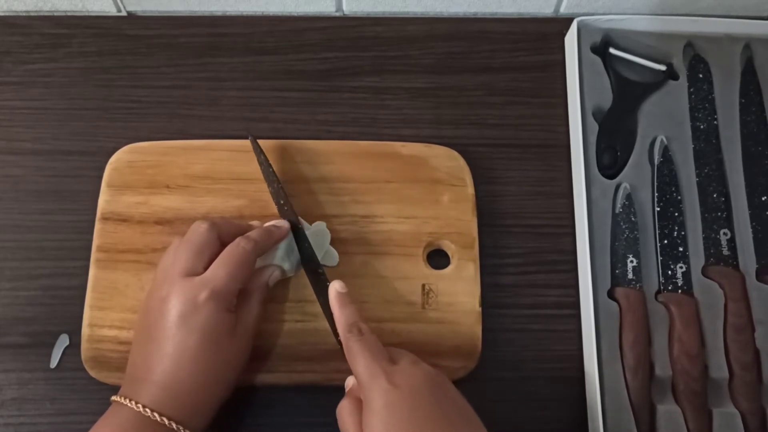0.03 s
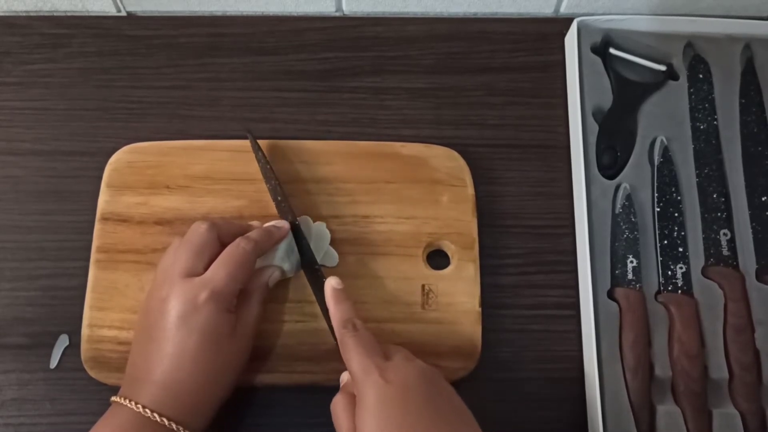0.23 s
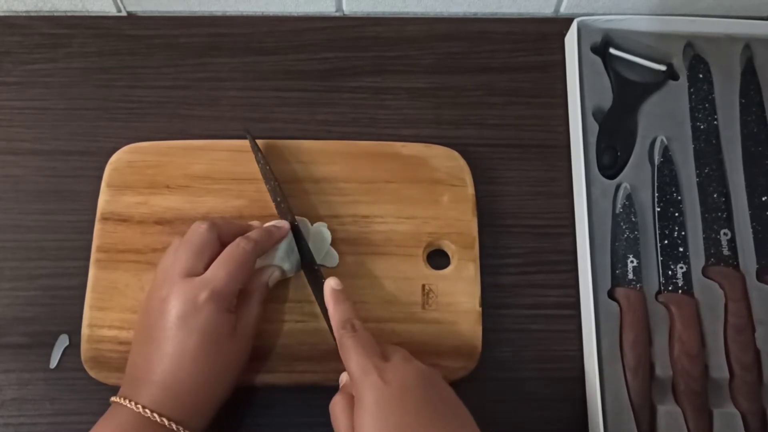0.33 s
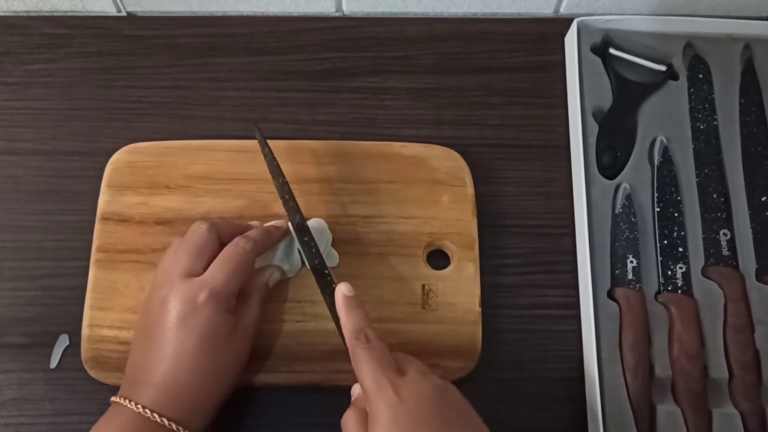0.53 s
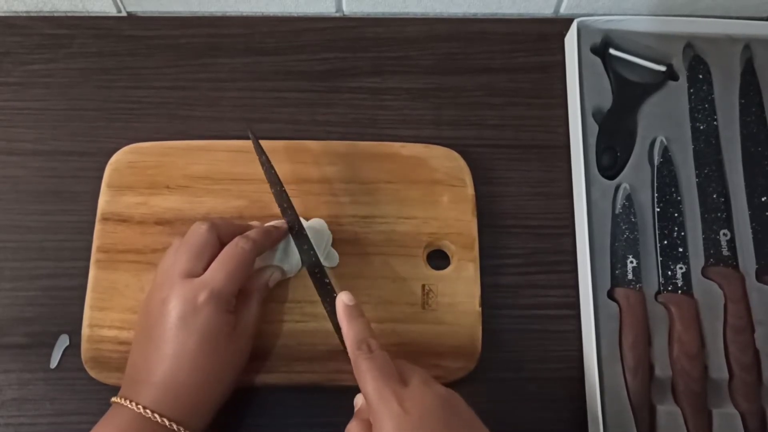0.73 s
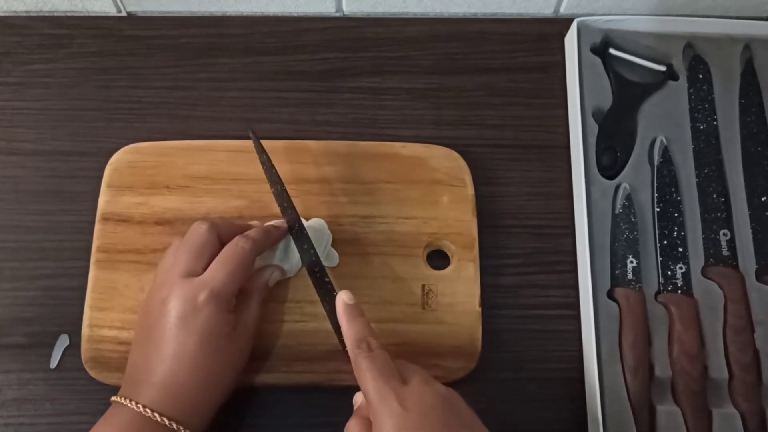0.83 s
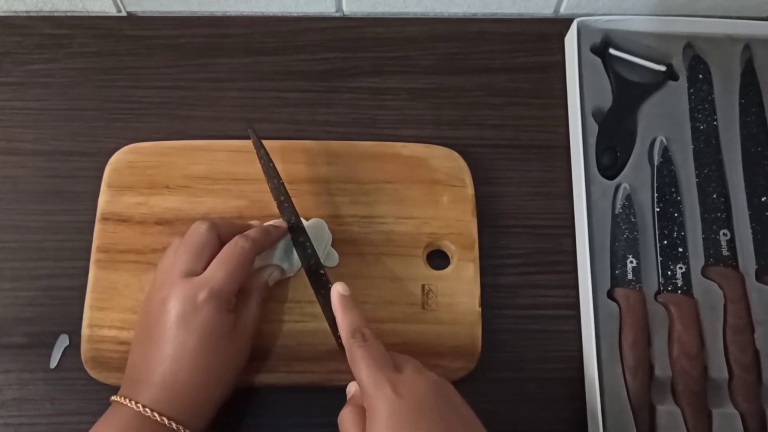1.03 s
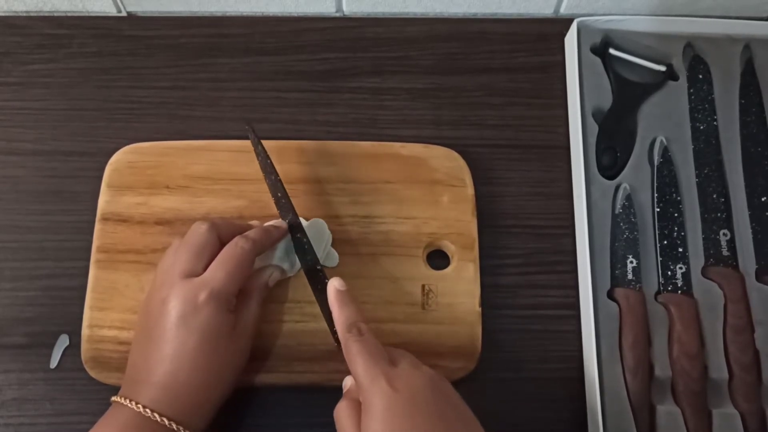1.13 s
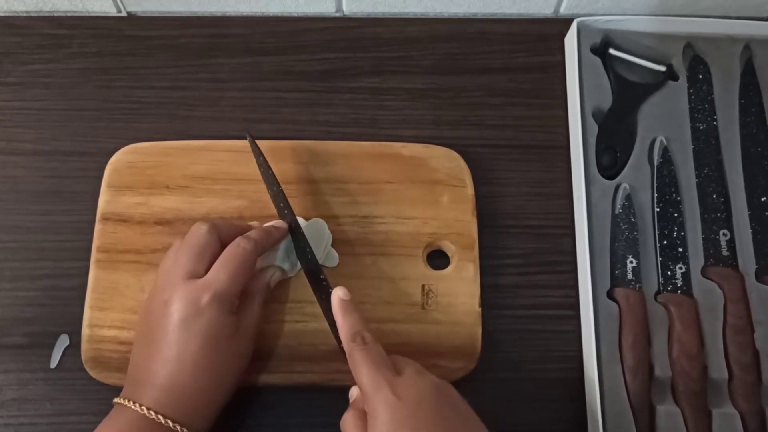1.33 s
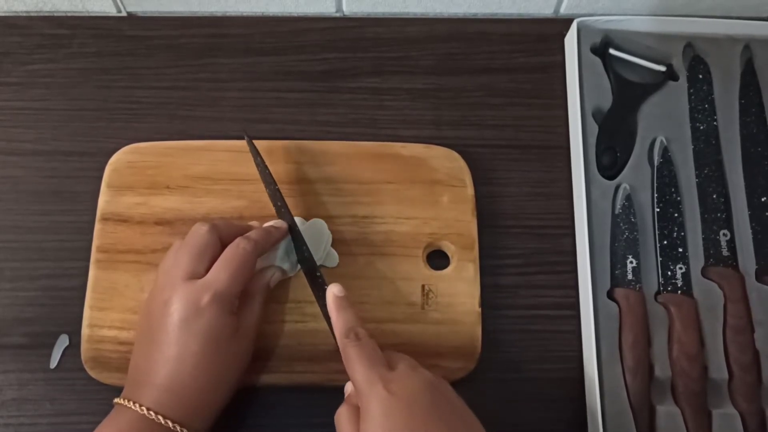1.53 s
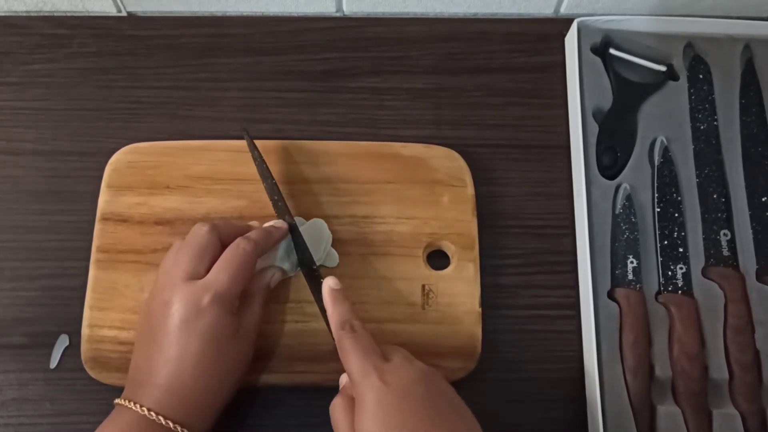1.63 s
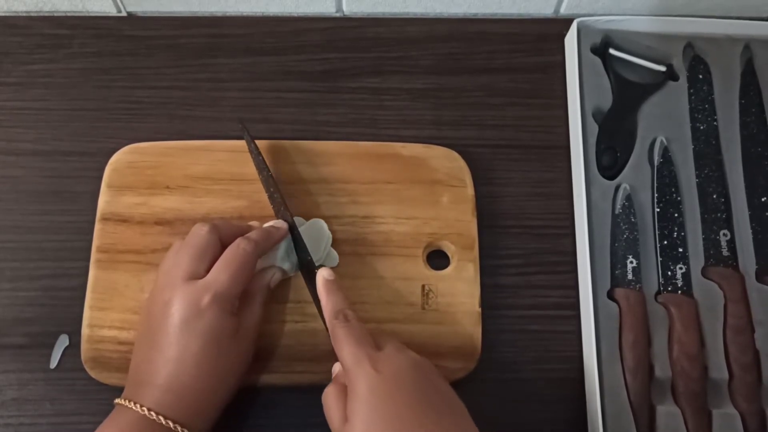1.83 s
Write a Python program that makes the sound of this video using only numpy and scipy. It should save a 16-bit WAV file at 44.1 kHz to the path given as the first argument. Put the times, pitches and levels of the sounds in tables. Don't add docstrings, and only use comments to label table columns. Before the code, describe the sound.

After a brief quiet moment, one hard woody chop lands on a board on a table, with a soft low thud beneath and quick indoor reflections; then near silence with very faint room rumble and airy hiss.

```python
import sys
import numpy as np
from scipy import signal
from scipy.fft import rfft, irfft
from scipy.io import wavfile

SR = 44100
rng = np.random.default_rng(int(sys.argv[2]) if len(sys.argv) > 2 else 0)


def inscribe(sig):
    pcm = np.round(np.clip(np.atleast_2d(sig).T, -1, 1) * 32767)
    wavfile.write(sys.argv[1], SR, pcm.astype(np.int16))


def to_linear_factor(level_db):
    exponent = np.asarray(level_db, float) / 20
    return 10 ** exponent


N = 83790

KNOCK_S, CONTACT_S, EDGE_CONTACT_S = .22996, .00024, .00008
RIGHT_LEADS_S, BOARD_DB = .00005, .2
# pitch_hz, level_db, t60_s, polarity, left_over_right_db
BOARD_MODES = [(320, -30, .02, 1, -10), (760, -17, .021, 1, 2.5), (987, -9.5, .015, 1, -4),
               (1089, -19, .053, 1, 6), (1279, -0.7, .011, -1, 0), (1621, -12.3, .045, -1, 0),
               (1929, -8.4, .0066, 1, 1.2), (2404, -26, .02, 1, -4)]
# pitch_hz, level_db, t60_s, polarity, left_over_right_db
BLADE_MODES = [(2950, -40, .008, -1, 4), (3300, -33, .010, 1, 8), (3600, -27, .010, -1, -6),
               (4130, -23, .012, 1, -1), (4470, -31, .012, -1, 0), (5000, -40, .010, 1, -3),
               (5550, -43, .010, -1, 3), (6000, -36, .012, 1, 2), (6580, -30, .014, -1, -2),
               (7080, -33, .018, 1, -1), (7560, -30, .022, -1, 0), (7850, -30, .028, 1, -5),
               (8250, -31, .018, -1, 6), (10250, -39, .012, 1, 0)]
SLICE_S, SLICE_DB, SLICE_BRIGHT_DB = .004, -39, -10
# pitch_hz, level_db, t60_s, polarity, left_over_right_db
AIR_GAP_MODES = [(201, -32.5, .08, 1, -0.5), (490, -28.5, 0.12, 1, 1), (645, -35, 0.11, -1, -0.5)]
# pitch_hz, level_db, t60_s, polarity, left_over_right_db
TABLE_MODES = [(165, -41, .33, 1, 0), (393, -41, .22, -1, 4), (732, -43, .3, -1, 0), (768, -47, .5, -1, -3),
               (870, -43, .5, 1, 3), (947, -40, .4, -1, 0), (1136, -40, .4, 1, 0), (1228, -36, .3, -1, 0),
               (1362, -42, .3, 1, 0), (1588, -42, .24, -1, 0)]
# pitch_hz, level_db, t60_s, polarity, left_over_right_db
TABLE_TOP_MODES = [(326, -26, .26, 1, -2)]
AIR_GAP_SWELL_S, TABLE_SWELL_S, TABLE_TOP_SWELL_S = .0074, .02, .075
SETTLE_S, SETTLE_HZ, SETTLE_DB, SETTLE_RISE_S = .273, 1266, -30.5, .0038

# pitch_hz, t60_s
ROOM_DECAY = [(100, .5), (300, .34), (600, .30), (1300, .32), (2200, .36), (5000, 0.28), (8500, .26)]
# pitch_hz, level_db (per Hz)
ROOM_COLOUR = [(80, -16), (300, -11.5), (600, -6.5), (1200, 6), (1800, -10.5), (2700, -30), (3950, -18),
               (5100, -32.5)]
# pitch_hz, level_db (per Hz)
ROOM_TOP = [(5100, -40), (6000, -31.5), (7100, -26), (7800, -27.5), (8550, -27.5)]
# pitch_hz, likeness (0-1)
ROOM_LIKENESS = [(150, 0.8), (400, 0.4), (1000, 0.06), (4000, 0.3), (8000, 0)]
ROOM_DB, ROOM_LUMPS_DB = -25.5, 2.8
ROOM_BUILD_S, ROOM_BUILD_HIGH_S = .007, .011

DIP_HZ, DIP_WIDTH_HZ, DIP_SHARE, MIC_TOP_HZ = 5150, 400, .6, 12200
ROUNDING_LEVEL = 1.15

# pitch_hz, level_db (per Hz)
RUMBLE_COLOUR = [(20, -34), (40, -20), (90, -3.5), (165, -3), (300, -13), (700, -18.5), (2100, -28.5),
                 (4300, -29.5)]
RUMBLE_DB, RUMBLE_PATCHY_DB = -61, 1.62
# pitch_hz, likeness (0-1)
LIKENESS = [(30, .25), (80, .55), (200, .53), (400, .16), (1300, .02), (5500, .03), (7000, .7), (9000, .97)]
# pitch_hz, level_db (per Hz)
AIR_COLOUR = [(4300, -5), (4780, -2), (4900, -16), (5500, -15), (6400, -7.5), (7300, -6), (7750, -10.5),
              (8520, -11)]
AIR_DB = -74.5
WHISTLE_HZ, WHISTLE_WIDTH_HZ, WHISTLE_DB = 4640, 219.5, -78.5
# time_s, level_db
WHISTLE_SWELL = [(0, 6.5), (.3, 0), (.6, 3.5), (.8, 5), (1, 3), (1.2, 0), (1.4, -5), (1.9, -1)]
# pitch_hz, width_hz, level_db
THIN_LINES = [(4712, 25, -89.5), (6810, 60, -91.5), (7268, 20, -95)]
# peak_s, length_s, level_db, pulse_depth (exponent)
TRILLS = [
    (0.29, 0.038, -82, 0.398),
    (1.1, 0.07, -86, 4.6),
    (1.8, 0.035, -84, 5.1),
]
TRILL_HZ, TRILL_RATE_HZ, TRILL_WOBBLE_HZ, TRILL_IDLE_DB = 9940, 295, 25, -102
# pitch_hz, level_db (per Hz)
WEAK_BAND_COLOUR = [(8700, -5.5), (9000, -5.5), (9100, 0), (10300, -1), (11250, -2)]
WEAK_BAND_DB, WEAK_BAND_PATCHY_DB = -91.5, 3.5
DUCK_DB, DUCK_S = -33.5, .06
# pitch_hz, level_db (per Hz)
HISS_COLOUR = [(11600, -3.5), (12900, -3), (13100, 1.5), (15500, -1)]
HISS_DB = -76
HISS_JUMP_DB, HISS_JUMP_S, HISS_TAIL_DB, HISS_TAIL_S = 12, .006, 4, .07


def rms_one(x):
    return x / np.sqrt(np.mean(x ** 2) + 1e-30)


def at_hz(points, hz):
    f, v = np.transpose(points)
    return np.interp(np.log(np.maximum(hz, 1)), np.log(f), v)


def drift(rate_hz):
    knots = rng.standard_normal(80)
    return np.interp(np.arange(N) / SR * rate_hz, np.arange(80), knots)


def bandpass(x, low_hz, high_hz):
    return signal.sosfilt(signal.butter(2, [low_hz, high_hz], "band", fs=SR, output="sos"), x)


def resonate_twice(x, hz, width_hz):
    b, a = signal.iirpeak(hz, hz / width_hz, fs=SR)
    return signal.lfilter(b, a, signal.lfilter(b, a, x))


def stereo_noise(colour, likeness=LIKENESS):
    hz = np.arange(N // 2 + 1) * SR / N
    inside = (hz >= colour[0][0]) * (hz <= colour[-1][0])
    gain = to_linear_factor(at_hz(colour, hz)) * inside
    alike = np.clip(at_hz(likeness, hz), 0, 1)
    mid, side = rfft(rng.standard_normal((2, N))) * gain
    mid = irfft(mid * np.sqrt(1 + alike), N)
    side = irfft(side * np.sqrt(1 - alike), N)
    return np.array([mid + side, mid - side]) / np.sqrt(np.mean(mid ** 2))


def struck(modes, contact_s):
    since = np.arange(N) / SR - KNOCK_S + np.array([[0], [RIGHT_LEADS_S]])
    push = np.sin(np.pi * np.clip(since / contact_s, 0, 1)) ** 2 * 2 / (contact_s * SR)
    out = 0
    for hz, db, t60, polarity, pan_db in modes:
        r, w = to_linear_factor(-60 / (t60 * SR)), 2 * np.pi * hz / SR
        ring = signal.lfilter([0, np.sin(w)], [1, -2 * r * np.cos(w), r * r], push + 1e-18)
        sides = to_linear_factor(db + pan_db / 2 * np.array([[1], [-1]]))
        out = out + np.sign(polarity) * sides * ring
    return out


def knock():
    return to_linear_factor(BOARD_DB) * struck(BOARD_MODES, CONTACT_S) + struck(BLADE_MODES, EDGE_CONTACT_S)


def slice_crunch():
    t = np.arange(N) / SR - KNOCK_S
    white = rng.standard_normal((2, 2, N))
    dull = bandpass(white[0], 600, 2200)
    bright = bandpass(white[1], 6200, 8400)
    crunch = rms_one(dull) + to_linear_factor(SLICE_BRIGHT_DB) * rms_one(bright)
    return to_linear_factor(SLICE_DB) * crunch * np.exp(-np.maximum(-t, 2 * t) / SLICE_S)


def table_thud():
    since = np.maximum(np.arange(N) / SR - KNOCK_S, 0)
    gap = struck(AIR_GAP_MODES, CONTACT_S) * (1 - np.exp(-(since / AIR_GAP_SWELL_S) ** 2))
    table = struck(TABLE_MODES, CONTACT_S) * (1 - np.exp(-since / TABLE_SWELL_S))
    top = struck(TABLE_TOP_MODES, CONTACT_S) * (1 - np.exp(-(since / TABLE_TOP_SWELL_S) ** 2))
    return gap + table + top


def settle():
    t = np.maximum(np.arange(N) / SR - SETTLE_S, 0)
    swell = t / SETTLE_RISE_S * np.exp(1 - t / SETTLE_RISE_S)
    return to_linear_factor(SETTLE_DB) * swell * np.sin(2 * np.pi * SETTLE_HZ * t)


def room():
    t = np.maximum(np.arange(N) / SR - KNOCK_S, 0)
    noise = [stereo_noise(ROOM_COLOUR + ROOM_TOP[1:], ROOM_LIKENESS) for _ in range(2)]
    edges = 70 * 2 ** np.arange(0, 7.6, .5)
    out = 0
    for k, (low, high) in enumerate(zip(edges, edges[1:])):
        hz = np.sqrt(low * high)
        band = bandpass(noise[k % 2], low, high)
        build_s = ROOM_BUILD_S if hz < 2500 else ROOM_BUILD_HIGH_S
        build = 1 - np.exp(-(t / build_s) ** 2)
        decay_db = -60 * t / at_hz(ROOM_DECAY, hz)
        out = out + band * build * to_linear_factor(ROOM_LUMPS_DB * drift(40) + decay_db)
    return to_linear_factor(ROOM_DB) * out


def capsule(x):
    b, a = signal.iirnotch(DIP_HZ, DIP_HZ / DIP_WIDTH_HZ, fs=SR)
    x = x + DIP_SHARE * (signal.lfilter(b, a, x) - x)
    return signal.sosfilt(signal.cheby2(8, 40, MIC_TOP_HZ, fs=SR, output="sos"), x)


def whistle():
    shared, left, right = rng.standard_normal((3, N))
    tone = resonate_twice(0.2 * shared + np.array([left, right]), WHISTLE_HZ, WHISTLE_WIDTH_HZ)
    swell_db = np.interp(np.arange(N) / SR, *np.transpose(WHISTLE_SWELL))
    return to_linear_factor(WHISTLE_DB + swell_db + 2.2 * drift(13)) * rms_one(tone)


def thin_lines():
    out = 0
    for hz, width_hz, db in THIN_LINES:
        out = out + to_linear_factor(db) * rms_one(resonate_twice(rng.standard_normal((2, N)), hz, width_hz))
    return out


def trills():
    t = np.arange(N) / SR
    beat = np.cos(2 * np.pi * TRILL_RATE_HZ * t) - .6
    level = to_linear_factor(TRILL_IDLE_DB) * np.exp(2.505 * beat)
    for peak_s, length_s, db, depth in TRILLS:
        level = level + to_linear_factor(db) * np.exp(depth * beat - ((t - peak_s) / length_s) ** 2)
    turns = np.cumsum(TRILL_HZ + TRILL_WOBBLE_HZ * drift(30)) / SR
    return level * np.sin(2 * np.pi * turns)


def weak_band():
    since = np.arange(N) / SR - KNOCK_S
    noise, edges = stereo_noise(WEAK_BAND_COLOUR), np.linspace(8600, 11400, 11)
    out = 0
    for low, high in zip(edges, edges[1:]):
        out = out + to_linear_factor(WEAK_BAND_PATCHY_DB * drift(25)) * bandpass(noise, low, high)
    duck_db = DUCK_DB * np.exp(-((since - DUCK_S) / DUCK_S) ** 4)
    return to_linear_factor(WEAK_BAND_DB + duck_db) * out


def preamp_hiss():
    since = np.arange(N) / SR - KNOCK_S
    jump_db = HISS_JUMP_DB * np.exp(-((since - HISS_JUMP_S / 2) / HISS_JUMP_S) ** 2)
    tail_db = HISS_TAIL_DB * np.exp(-np.maximum(since, -8 * since) / HISS_TAIL_S)
    return to_linear_factor(HISS_DB + jump_db + tail_db) * stereo_noise(HISS_COLOUR)


def background():
    rumble = to_linear_factor(RUMBLE_DB + RUMBLE_PATCHY_DB * drift(28)) * stereo_noise(RUMBLE_COLOUR)
    air = to_linear_factor(AIR_DB) * stereo_noise(AIR_COLOUR)
    return rumble + air + whistle() + thin_lines() + trills() + weak_band() + preamp_hiss()


def scene():
    return capsule(knock() + slice_crunch() + table_thud() + settle() + room()) + background()


def low_pass(x):
    return signal.sosfilt(signal.butter(12, 16790, fs=SR, output="sos"), x)


def record(dry):
    mix = dry / (1 + np.abs(dry / ROUNDING_LEVEL) ** 4) ** .25
    return low_pass(mix)


dry = scene()
out = record(dry)
inscribe(out)
```